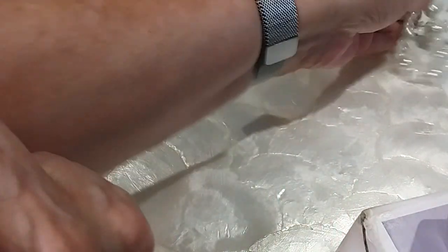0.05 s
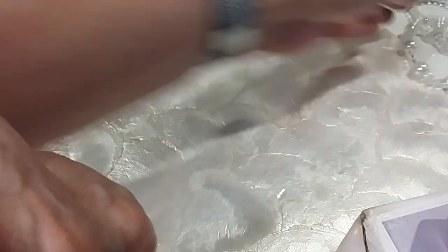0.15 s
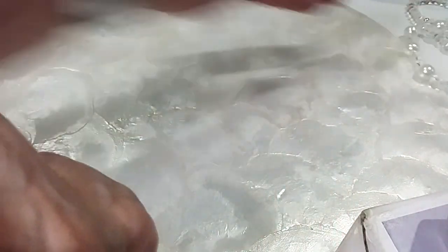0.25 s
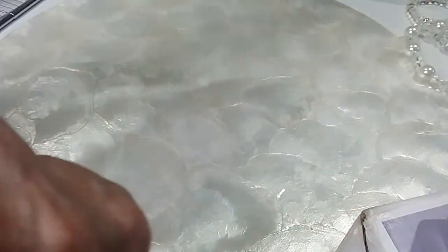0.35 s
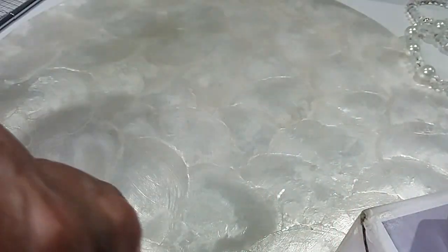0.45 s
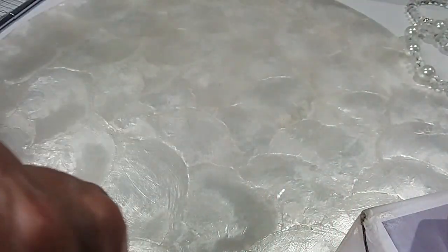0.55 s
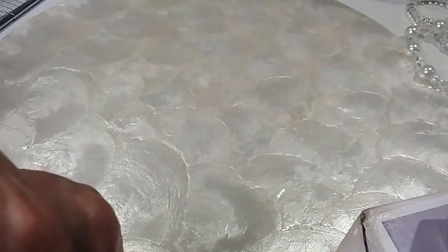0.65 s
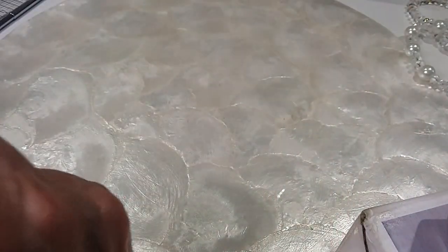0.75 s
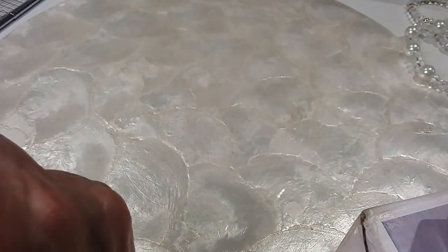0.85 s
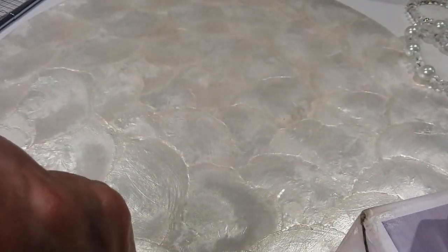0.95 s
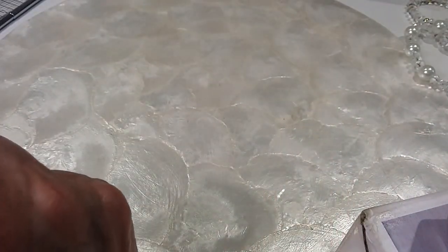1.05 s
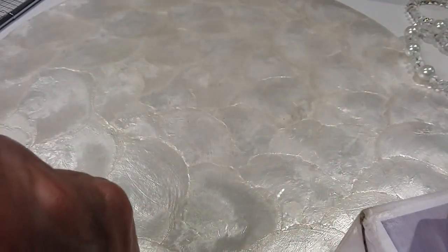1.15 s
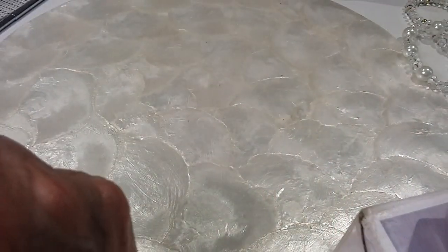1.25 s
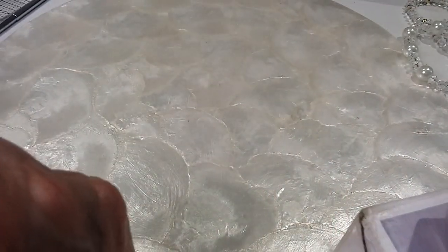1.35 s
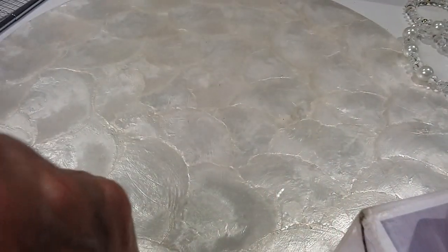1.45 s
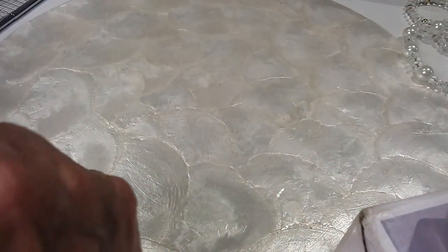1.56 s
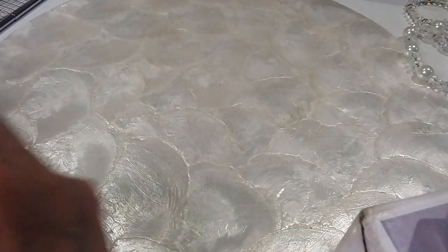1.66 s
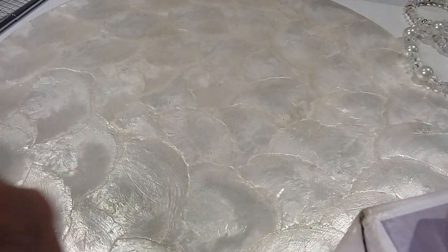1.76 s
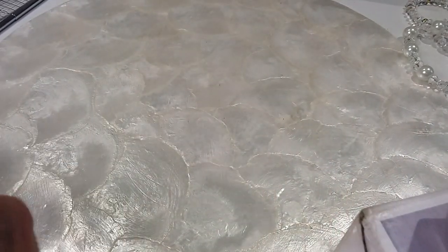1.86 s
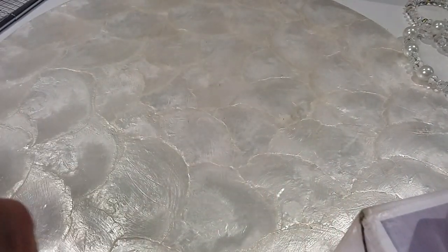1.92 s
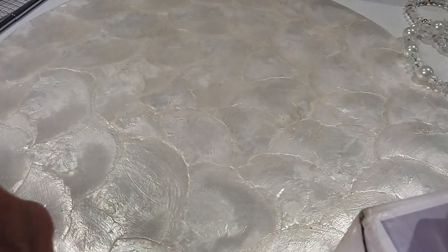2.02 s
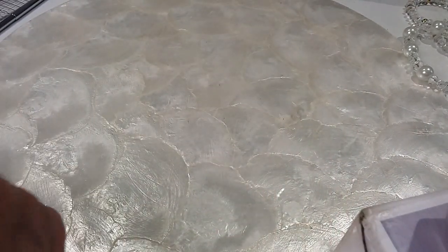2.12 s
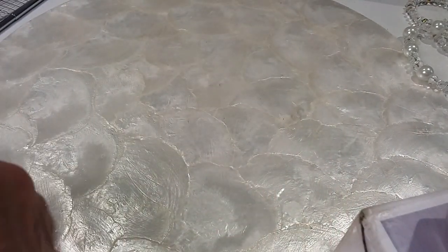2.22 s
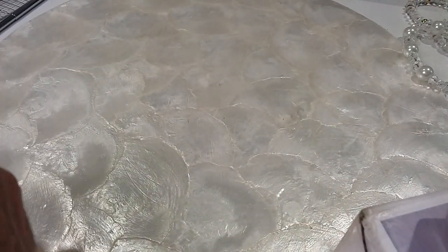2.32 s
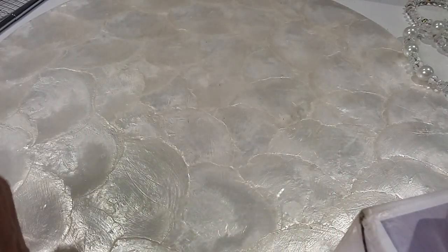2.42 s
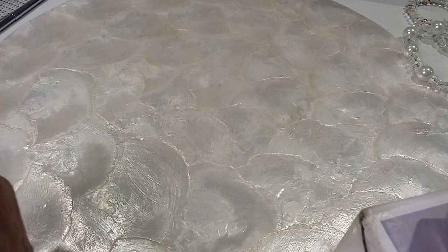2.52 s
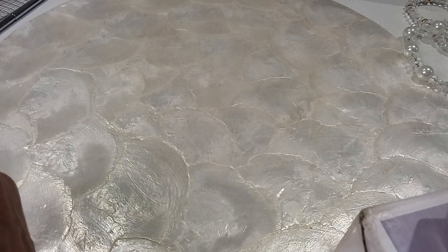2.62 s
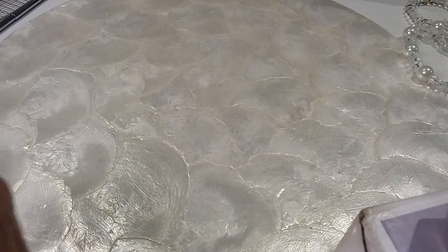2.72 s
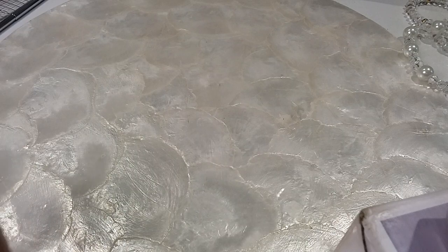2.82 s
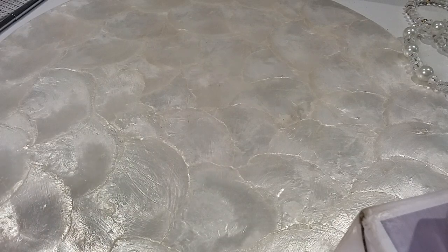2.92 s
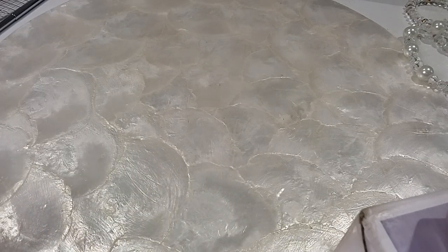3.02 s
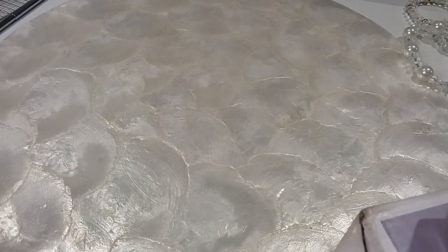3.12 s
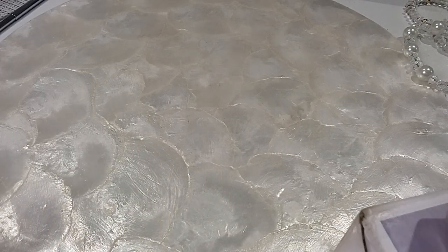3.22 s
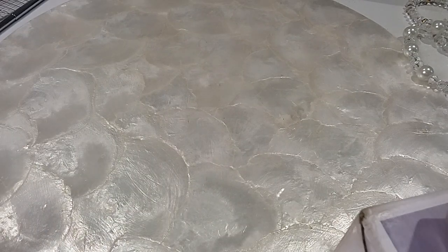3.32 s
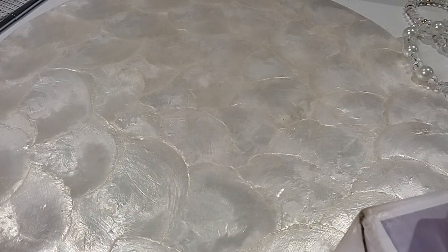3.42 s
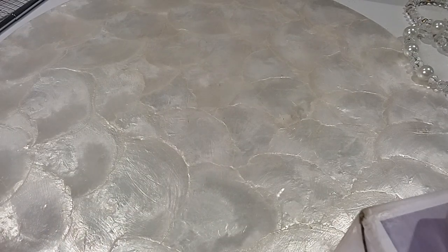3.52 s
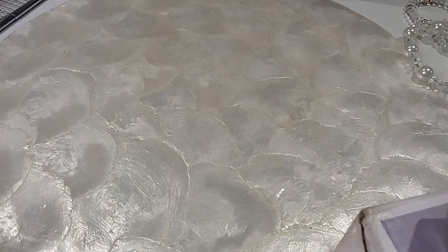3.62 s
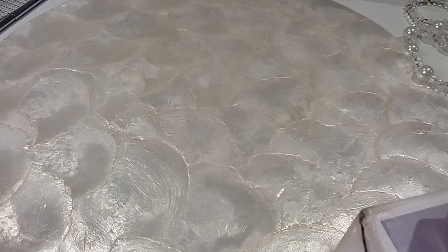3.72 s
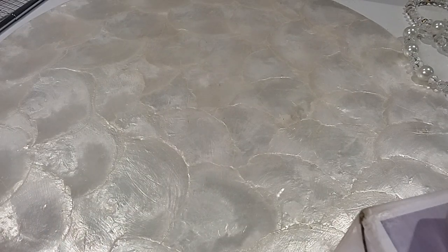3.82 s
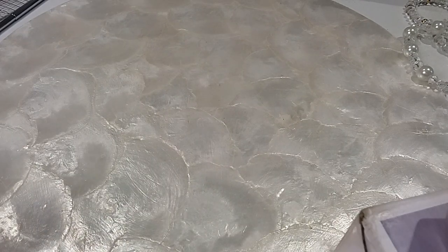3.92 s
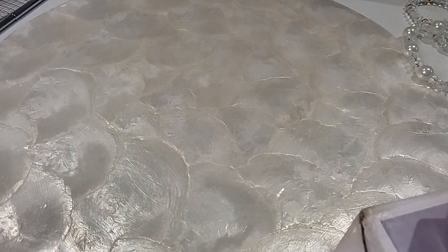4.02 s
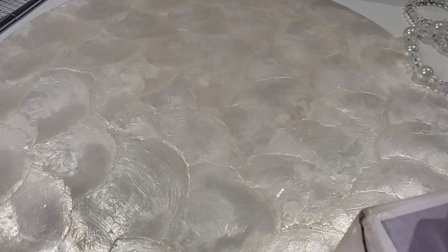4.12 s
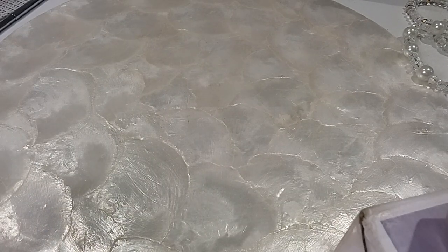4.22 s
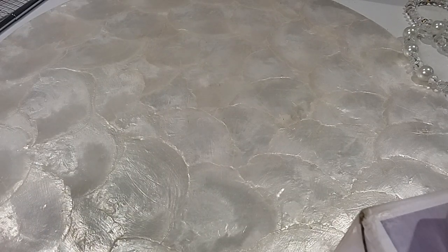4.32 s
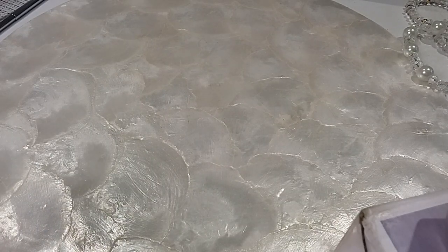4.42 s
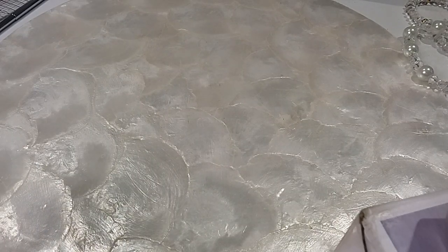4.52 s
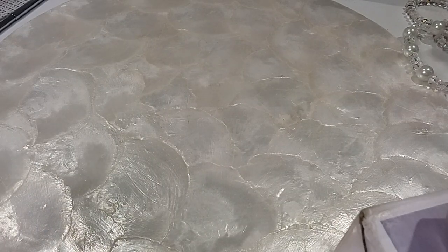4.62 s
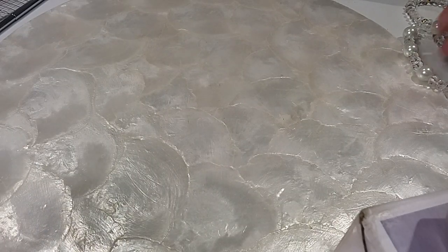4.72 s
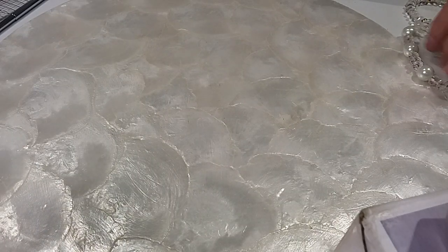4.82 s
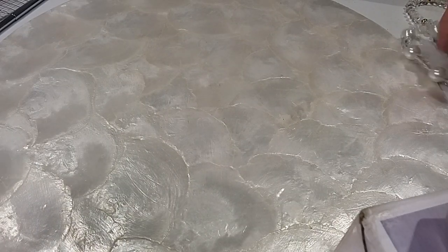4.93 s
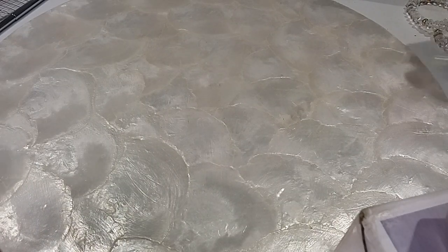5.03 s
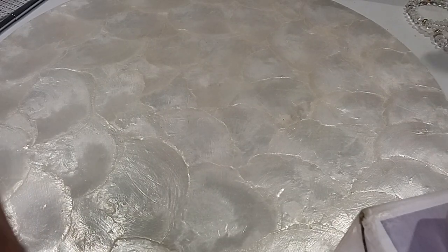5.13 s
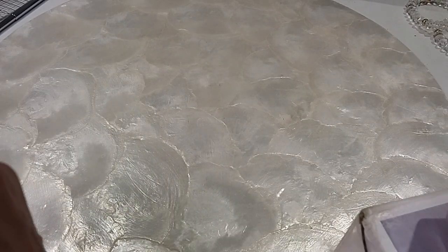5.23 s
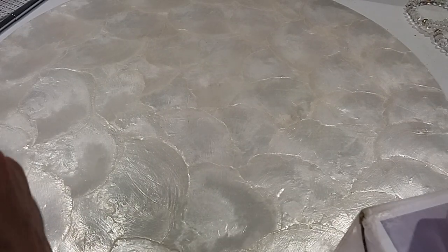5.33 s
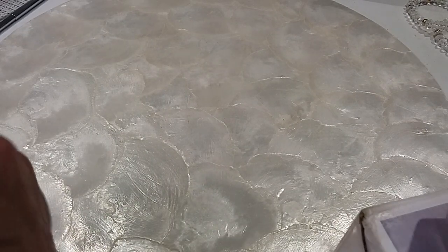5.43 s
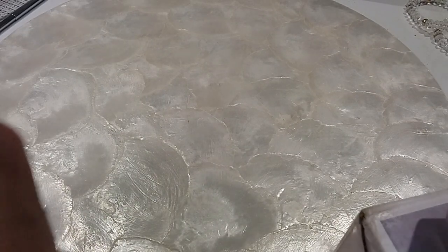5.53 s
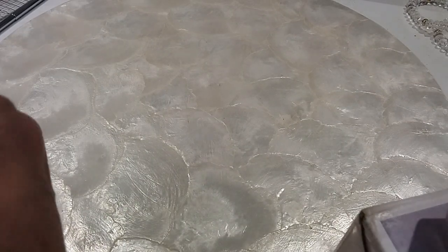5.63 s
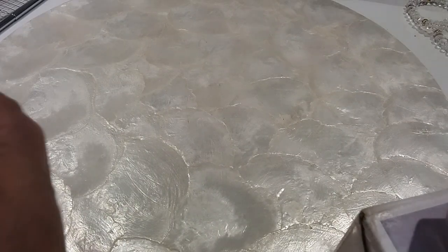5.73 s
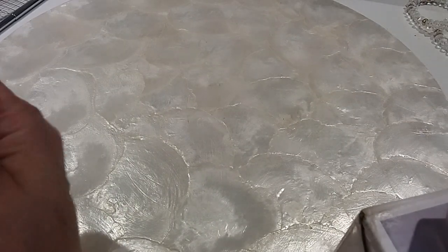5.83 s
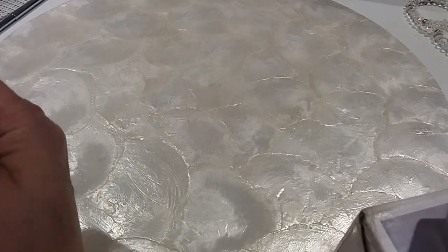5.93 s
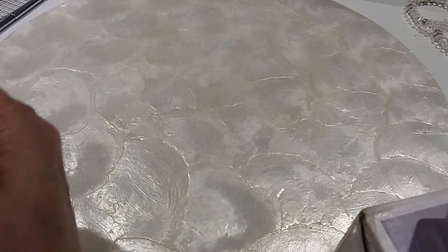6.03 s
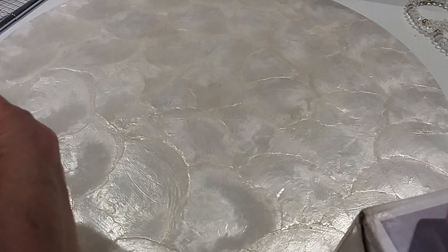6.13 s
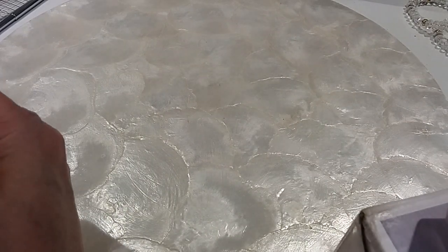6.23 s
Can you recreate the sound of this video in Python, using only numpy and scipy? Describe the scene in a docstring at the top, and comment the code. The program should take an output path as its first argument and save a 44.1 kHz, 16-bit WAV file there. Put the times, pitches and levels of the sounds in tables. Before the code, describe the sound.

Very close, beads drop and roll on a hard shell-covered table from 0 to 0.3 s, a loud dense run of ringing clacks ending with the strongest hits and a soft bump. Only a low motor hum and room air remain until a faint bump at 0.7 and light bead clicks near 1.0. From 1.2 to 1.75 s come fine rustles, crisp ticks and barely audible tiny squeaks. A duller clack falls at 2.0, then a hard object lands at 2.3 s with a loud woody knock and quick settling. Snaps follow to 2.5, with a small double bead click at 2.9. Ticks at 3.2 lead to busy picking, swishes and thin singing scrapes from 3.55 to 4.2. After a pause, beads rattle lightly at 4.9-5.2. Soft rubbing and sparse clicks finish around 5.9-6.2. The small room answers with a brief tail.

```python
"""Bead bracelets on a shell-topped table

Close to the microphone, beads roll and clack on the table: grains, ringing clicks and one hop per bead.
Beside them things are picked through with rustles, ticks, squeaks and scrapes, all made of filtered
grains, damped rings and short tones; something hard lands with a knock built of a thud and table modes.
A motor hums over the air of the small room, whose decaying noise tail answers most of the contacts."""
import sys
import numpy as np
from scipy import signal
from scipy.fft import rfft, irfft, next_fast_len
from scipy.io import wavfile
from scipy.ndimage import map_coordinates

SR = 44100
rng = np.random.default_rng(int(sys.argv[2]) if len(sys.argv) > 2 else 0)


def generate_wav(sig):
    """Save sig (samples, or channels by samples) to the path in sys.argv[1] as 16-bit PCM at SR."""
    pcm = np.round(np.clip(np.atleast_2d(sig).T, -1, 1) * 32767).astype(np.int16)
    wavfile.write(sys.argv[1], SR, pcm)


N = 276176  # length in samples
TOP_HZ = 16050  # upper band limit at the microphone


def amp(db):
    """Decibels to gain."""
    return 10 ** (np.asarray(db) / 20)


def unit(x):
    """Scaled to rms 1."""
    return x / np.sqrt(np.mean(x ** 2) + 1e-20)


def at_peak(x, db):
    """x scaled to a peak level."""
    return amp(db) * x / np.abs(x).max()


def add(track, s, x):
    """Mix x into the track from time s."""
    start = max(round(s * SR), 0)
    track[start:start + len(x)] += x[:max(N - start, 0)]


def along(points, hz):
    """(Hz, value) points read on a log axis."""
    f, v = np.transpose(points)
    return np.interp(np.log(np.maximum(hz, f[0])), np.log(f), v)


def wobble(rate):
    """A smooth random curve, rate knots a second."""
    knots = rng.standard_normal(int(N * rate / SR) + 4)
    return map_coordinates(knots, [np.arange(N) * rate / SR])


def coloured(x, gain_db):
    """x shaped by a function of frequency that gives dB."""
    m = next_fast_len(N + SR // 4)
    gain = amp(gain_db(np.fft.rfftfreq(m, 1 / SR)))
    return irfft(rfft(x, m) * gain, m)[:N]


def pulse(gain_db, size=2048):
    """The causal (minimum-phase) click whose spectrum is the given function of frequency."""
    cepstrum = irfft(np.log(amp(gain_db(np.fft.rfftfreq(size, 1 / SR)))))
    cepstrum[1:size // 2] *= 2
    cepstrum[size // 2 + 1:] = 0
    return irfft(np.exp(rfft(cepstrum)))


def resonance(hz, centre, q):
    """A bell of height 1 around the centre frequency."""
    return 1 / np.sqrt(1 + (2 * q * (hz - centre) / centre) ** 2)


def scatter(t60, db):
    """An impulse followed by dense, dying micro-contacts of the given total level."""
    t = np.arange(SR // 10) / SR
    tail = rng.standard_normal(len(t)) * amp(-60 * t / t60)
    return (t == 0) + amp(db) * tail / np.linalg.norm(tail)


def grains(rate, spread_db):
    """Random tiny contacts of uneven size, rms 1."""
    sizes = amp(spread_db * np.minimum(rng.exponential(size=N), 3))
    signed = sizes * rng.choice([-1, 1], N)
    return unit(signed * (rng.random(N) < rate / SR))


def pings(rate, centre_hz, octaves, cycles, spread_db):
    """A cloud of tiny damped rings, each at its own pitch and size; rms 1."""
    draws = rng.random((int(rate * N / SR), 4))
    when, low, high, size = draws.T[:, :, None]
    hz = np.minimum(centre_hz * 2 ** (octaves * (high - low)), TOP_HZ)
    n = np.arange(SR // 150)
    turns = hz * n / SR
    rings = amp(spread_db * size ** 2) * np.sin(2 * np.pi * turns) * np.exp(-turns / cycles)
    places = (when * N).astype(int) + n
    return unit(np.bincount(places.ravel(), rings.ravel(), N)[:N])


# decay of the small room: pitch_hz, t60_s
ROOM_DECAY = [(150, 0.26), (1500, 0.2), (5000, 0.2), (15000, 0.092)]


def room_tail():
    """A fresh answer of the room, of energy 1, which builds up over a few milliseconds."""
    hz, t, z = signal.stft(rng.standard_normal(SR // 2), SR, nperseg=256)
    decay = amp(-60 * t / along(ROOM_DECAY, hz)[:, None])
    tail = signal.istft(z * decay, SR, nperseg=256)[1]
    tail *= 1 - np.exp(-np.arange(len(tail)) / SR / 0.0014)
    return tail / np.linalg.norm(tail)


def in_room(x, wet_db):
    """x followed by the room's answer."""
    answer = amp(wet_db) * room_tail()
    answer[0] = 1
    return signal.fftconvolve(x, answer)


def contact(colour, ring, chatter, db, wet_db):
    """A ringing, chattering click; the room gathers it from all sides and so keeps only its broad colour."""
    click = pulse(lambda hz: colour(hz) + ring(hz))
    direct = at_peak(signal.fftconvolve(click, chatter), db)
    sound = signal.fftconvolve(pulse(colour), room_tail())
    sound *= amp(wet_db) * np.linalg.norm(direct) / np.linalg.norm(sound)
    sound[:len(direct)] += direct
    return sound


ATTACK_S = 0.013  # every stroke gets under way in this time
RUB_FADE_DB_PER_S = 197  # a rub or scrape holds its level, then the fingers let go


def stroke(s, length, sag_db_per_s, fade_db_per_s):
    """The gain of one movement of the hand: a quick rise, a sagging hold, a fade."""
    t = np.maximum(np.arange(N) / SR - s, 0)
    sag_db = sag_db_per_s * np.minimum(t, length)
    fade_db = fade_db_per_s * np.maximum(t - length, 0)
    return np.minimum(t / ATTACK_S, 1) * amp(-sag_db - fade_db)


MOTOR_HZ, MAINS_HZ = 58.58, 60  # turning rate, supply frequency
# orders of the motor in the room: multiple of the turning rate, level_db (rms, before a slight wobble)
MOTOR_ORDERS = [(1, -74), (2, -60), (3, -50.5), (4, -67), (5, -67), (6, -69), (7, -74)]
# colour of the room air at the microphone: pitch_hz, relative level_db
AIR_COLOUR = [(25, -35), (55, -11), (85, -9), (120, 0), (190, -1), (280, -5.5), (450, -13), (750, -18),
              (1600, -19), (3000, -24.5), (5500, -29.5), (8500, -39.5), (12000, -33), (16000, -33)]


def hum():
    """A motor's orders and faint whine over room air; its magnetic buzz beats slowly against the second order."""
    t = np.arange(N) / SR
    turns = MOTOR_HZ * t + 0.0049 * wobble(5.2)
    tone = np.zeros(N)
    for k, db in MOTOR_ORDERS:
        level = amp(db + 0.78 * wobble(5.4)) * np.sqrt(2)
        tone += level * np.sin(2 * np.pi * (k * turns + rng.random()))
    buzz = amp(-61) * np.sin(2 * np.pi * (2 * MAINS_HZ * t + rng.random()))
    whine = amp(-73 + 1.5 * wobble(6)) * np.sin(2 * np.pi * 892 * t + wobble(12))
    air = amp(-58.5) * unit(coloured(rng.standard_normal(N), lambda hz: along(AIR_COLOUR, hz)))
    return tone + buzz + whine + air


# rings of beads on the table top: pitch_hz, nominal lift_db
TABLE_RINGS = [(850, 7.5), (1600, 3), (2380, 11), (3150, 5.5), (10000, -5.5)]


def table_lift(hz, strengths):
    """The resonances of beads on the table top in dB, each driven at its own strength."""
    return sum(share * db * resonance(hz, centre_hz, q=4.9)
               for share, (centre_hz, db) in zip(strengths, TABLE_RINGS))


# beads dragged over the table: start_s, length_s, level_db (rms of the rattle before it sags)
BEAD_DRAGS = [(-0.02, 0.12, -35), (0.11, 0.12, -46), (0.961, 0.14, -58), (1.253, 0.1, -55),
              (2.974, 0.21, -63.5), (3.292, 0.071, -67), (4.87, 0.059, -53), (4.99, 0.024, -52)]
DRAG_SAG_DB_PER_S, DRAG_FADE_DB_PER_S = 39, 273  # the beads lose speed, then come to rest
# colour of bead on shell, for drags and clacks: pitch_hz, relative level_db
BEAD_COLOUR = [(40, -75), (120, -22), (200, -9), (500, -9), (850, -4), (1150, -0.5), (1700, -3), (2700, -9),
               (4200, -13.5), (8000, -20.5), (10500, -12.5), (16000, -25.5)]


def slide():
    """Rolling beads trip over the seams of the shell in a run of tiny clacks."""
    level = np.max([amp(db) * stroke(s, length, DRAG_SAG_DB_PER_S, DRAG_FADE_DB_PER_S)
                    for s, length, db in BEAD_DRAGS], axis=0)

    def colour(hz):
        lift = table_lift(hz, np.ones(len(TABLE_RINGS)))
        return along(BEAD_COLOUR, hz) + lift + 3 * resonance(hz, 2800, q=5.1)

    rattle = unit(coloured(grains(rate=550, spread_db=1.0), colour))
    beads = pings(rate=150, centre_hz=2000, octaves=1.0, cycles=2.9, spread_db=20)
    return in_room(level * (rattle + amp(-10.5) * beads), wet_db=-5.5)[:N]


# strokes of rubbing as things are picked through:
# start_s, length_s, level_db (rms of the swish), crisp_db (crisp top relative to the swish)
RUB_STROKES = [(-0.015, 0.07, -58.5, 5), (1.213, 0.049, -65.5, -14), (1.298, 0.02, -59, 3),
               (1.32, 0.088, -60, -3), (1.463, 0.24, -70, 0), (1.691, 0.028, -59.5, -16),
               (2.02, 0.16, -59.5, -13), (2.336, 0.19, -60.5, -0.5), (2.544, 0.11, -69, -5),
               (2.789, 0.36, -67, -21), (3.193, 0.14, -66, -4), (3.35, 0.13, -62, -17),
               (3.635, 0.044, -53, -9), (3.674, 0.045, -56.5, -12), (3.77, 0.02, -62, -13),
               (3.924, 0.034, -56, -12), (3.983, 0.014, -53.5, -15), (4.098, 0.1, -58, -13),
               (4.163, 0.025, -52.5, -11), (4.88, 0.032, -70, 3), (5.02, 0.06, -66.5, -2),
               (5.33, 0.21, -68, -18), (5.95, 0.24, -69, -11), (6.192, 0.043, -54.5, -16)]


def rubbing_levels():
    """The levels of the swish and of its crisp top in dB; the strongest stroke leads at each moment."""
    levels = np.full((2, N), 1e-6)
    for s, length, db, crisp_db in RUB_STROKES:
        peaks = amp([[db], [db + crisp_db]])
        levels = np.maximum(levels, peaks * stroke(s, length, 0, RUB_FADE_DB_PER_S))
    return 20 * np.log10(levels)


GENTLE_DB, FIRM_RANGE_DB = -72.5, 19.5  # rubbing starts to tinkle here, and does so fully this much higher
# colours of the low swish and of its crisp top: pitch_hz, relative level_db
SWISH_COLOUR = [(150, -27), (500, 9), (1500, 9.5), (3000, 7.5), (6500, -0.5), (8500, -5.5), (16000, -39)]
CRISP_COLOUR = [(4000, -48), (8500, -8), (10000, -20), (13000, 0), (16000, 6)]


def rustle(swish_db, crisp_db):
    """A fine swish of rubbing with crisp grains on top; firmer handling shakes tiny pitched ticks out of it."""
    firmness = np.clip((swish_db - GENTLE_DB) / FIRM_RANGE_DB, 0, 1)
    swish = unit(coloured(grains(rate=5000, spread_db=12), lambda hz: along(SWISH_COLOUR, hz)))
    tinkle = pings(rate=180, centre_hz=4620, octaves=0.98, cycles=4.0, spread_db=6)
    crisp = unit(coloured(grains(rate=1500, spread_db=9), lambda hz: along(CRISP_COLOUR, hz)))
    sparkle = pings(rate=290, centre_hz=11900, octaves=0.26, cycles=4.4, spread_db=-4)
    rubbing = amp(swish_db) * (swish + amp(-1) * firmness * tinkle)
    rubbing += amp(crisp_db) * (crisp + amp(-2.5) * sparkle)
    grip = amp(2.2 * wobble(45))  # the level wavers with the grip
    return in_room(rubbing * grip, wet_db=-7.5)[:N]


STRAY_PER_S = 22  # chances a second, taken only while things rub
STRAY_DB, STRAY_SPREAD_DB = 21, 5  # peak over the rubbing, scatter either way
STRAY_HZ = 4200  # middle ring, scattered an octave either way
STRAY_BODY_DB, STRAY_TREBLE_DB = -4, -11.5


def stray_ticks(rub_db):
    """Rows of chance ticks, as strong as the rubbing that shakes them loose."""
    rows = []
    for when, size, pitch in rng.random((int(STRAY_PER_S * N / SR), 3)):
        db = rub_db[int(when * N)]
        if db > GENTLE_DB - 2:
            peak_db = db + STRAY_DB + STRAY_SPREAD_DB * (2 * size - 1)
            ring_hz = STRAY_HZ * 2 ** (2 * pitch - 1)
            rows.append((when * N / SR, peak_db, ring_hz, STRAY_BODY_DB, STRAY_TREBLE_DB))
    return rows


def rebound(x, db):
    """x and its weaker repeat: the bead makes a tiny second bounce a moment later."""
    lag = round(rng.uniform(.001, .0028) * SR)
    return np.pad(x, (0, lag)) + amp(db) * np.pad(x, (lag, 0))


# beads meeting the table close by: start_s, peak_db, ring_hz, body_db, treble_db (tilts of the colour)
BEAD_CLACKS = [(0.009, -28, 1640, 3, 4), (0.034, -18.5, 1710, -5, -7), (0.048, -15.5, 1660, 4, -12),
               (0.07, -29.5, 2400, -1, 17), (0.102, -24.5, 2240, 1, -8), (0.117, -12.5, 1660, 2, 6.5),
               (0.16, -22, 2520, -9, -9), (0.179, -27.5, 2390, -2, -20), (0.219, -11.5, 1750, -9, 1),
               (0.232, -12, 2550, 15.5, 6.5), (0.978, -32.5, 2230, 5, 7), (1.004, -30, 2660, -22, 4.5),
               (1.36, -28, 2350, 8, 14.5), (1.707, -34.5, 690, 10, -5), (2.013, -38, 2420, 1, -5),
               (2.024, -19, 2130, -1, -19), (2.169, -34.5, 1800, 4, 2), (2.918, -27.5, 1450, 2, -4),
               (2.926, -29, 1540, -11, -11), (4.862, -23, 2900, 1, 4), (5.015, -29, 1730, 9.5, 3),
               (5.058, -21.5, 1670, -14, -4), (5.072, -32, 1600, -2, 0), (5.082, -26.5, 1550, 0, 0),
               (5.206, -42, 600, 9, 1), (5.362, -41.5, 2160, 5, 3), (5.886, -33.5, 1840, 7.5, -3)]
BOUNCE_S, BOUNCE_DB = 0.009, -14  # typical flight time, level of the second landing against the first


def clacks():
    """Each bead chatters on the table for an instant, rings the spot where it lands and hops once."""
    out = np.zeros(N)
    for s, db, ring_hz, body_db, treble_db in BEAD_CLACKS:
        strengths = rng.uniform(.5, 1.5, len(TABLE_RINGS))

        def colour(hz):
            body = body_db * along([(600, 0.95), (1100, 0.047)], hz)
            treble = treble_db * along([(2800, 0.089), (6000, 1.0)], hz)
            return along(BEAD_COLOUR, hz) + table_lift(hz, strengths) + body + treble

        ring = lambda hz: 9 * resonance(hz, ring_hz, q=9.6)
        flight = BOUNCE_S * rng.uniform(.7, 1.3)
        for when, peak_db in [(s, db), (s + flight, db + BOUNCE_DB)]:
            chatter = rebound(scatter(t60=0.0063, db=9.5), db=-4.5)
            add(out, when, contact(colour, ring, chatter, peak_db, wet_db=-8.0))
    return out


# soft bumps that move the table top: start_s, peak_db (before the room answers), pitch_hz
TABLE_BUMPS = [(0.235, -27.5, 278), (0.742, -41, 225), (2.072, -34, 190.8), (2.169, -38, 239.5),
               (2.925, -37.5, 434), (4.865, -44, 113.9)]
# colour of a bump: multiple of its pitch, relative level_db
BUMP_COLOUR = [(.2, -33), (.6, -0.5), (1, 5), (1.8, -6.5), (6, -43), (20, -91)]


def bumps():
    """Soft pushes that the table damps within a cycle or two."""
    out = np.zeros(N)
    for s, db, centre_hz in TABLE_BUMPS:
        push = pulse(lambda hz: along(BUMP_COLOUR, hz / centre_hz))
        add(out, s, in_room(at_peak(push, db), wet_db=-2.0))
    return out


# the clear snaps of handling: start_s, peak_db, ring_hz, body_db, treble_db (tilts of the colour)
HANDLING_TICKS = [(1.0725, -42.5, 2290, -12, -6), (1.260, -30, 6490, -5, -2),
                  (1.313, -25.5, 3630, -6, -4.5), (1.398, -34, 6970, 3, -5), (1.516, -36, 5860, -18, 0),
                  (1.588, -31.5, 5940, -19, -2), (1.7125, -30, 2450, -3, -8),
                  (1.8414, -43, 5900, -14, -7.5), (2.0194, -26.5, 2200, -1.5, -17),
                  (2.069, -30.5, 2220, 3.5, -14), (2.240, -35.5, 2000, -8, -9.5),
                  (2.328, -31, 1820, -16, -5), (2.373, -23, 2090, -8, 0.5), (2.433, -29.5, 1910, -0.5, -7),
                  (2.478, -26, 4870, -7.5, -2.5), (2.5004, -24.5, 6660, -11.5, 8),
                  (2.679, -39, 2090, -3, -16), (2.837, -45, 5960, -9, -32), (3.1958, -24.5, 3980, -6, -5),
                  (3.2085, -32, 2900, 3, 3), (3.426, -36.5, 5570, -5, -13), (3.5755, -27, 6450, -7.5, -8.5),
                  (3.622, -29.5, 6060, -22, -18), (3.6343, -27, 1910, 2, -12), (3.646, -22.5, 2000, 3, -20),
                  (3.654, -23.5, 6830, -16, -10), (3.680, -25.5, 3200, -8, -11),
                  (3.7287, -28.5, 1795, -1.5, -14), (3.773, -22.5, 3620, -1, -8.5),
                  (3.910, -31, 2060, 3.5, -17), (3.925, -27.5, 5380, -2, -18),
                  (3.931, -23, 6950, -3.5, -12.5), (3.9996, -24.5, 4150, -3, -19),
                  (4.0645, -33.5, 6980, -22, 5), (4.1585, -30, 2740, -3, -16),
                  (4.1845, -25.5, 6960, -5, -10), (4.193, -24, 5630, -3.5, -8),
                  (5.947, -32.5, 4557, -1, -21), (5.974, -34.5, 2750, -2, -34),
                  (6.142, -35.5, 1980, -7, -26), (6.214, -27.5, 3150, 2, -19)]
# colour of a tick: pitch_hz, relative level_db
TICK_COLOUR = [(40, -42), (350, 1), (1500, -1), (3500, -6), (6700, -5.5), (8500, -13), (10500, -5.5),
               (16000, -8)]


def ticks(rows):
    """Small snaps, each with its own ring, body and brightness."""
    out = np.zeros(N)
    for s, db, ring_hz, body_db, treble_db in rows:
        def colour(hz):
            body = body_db * along([(2000, 1.0), (3500, 0.099)], hz)
            treble = treble_db * along([(7000, 0.023), (9500, 1.0)], hz)
            return along(TICK_COLOUR, hz) + body + treble + 2 * resonance(hz, ring_hz, q=8.3)

        ring = lambda hz: 7 * resonance(hz, ring_hz, q=12)
        add(out, s, contact(colour, ring, scatter(t60=0.01, db=4.0), db, wet_db=-4.0))
    return out


# brief squeaks of something sticking as it slips: start_s, peak_db (before the room answers), pitch_hz
SLIP_SQUEAKS = [(1.147, -41, 576), (1.622, -41, 2000)]


def squeaks():
    """A narrow, scratchy tone that swells and is gone in about ten milliseconds."""
    out, t = np.zeros(N), np.arange(SR // 10) / SR
    for s, db, hz in SLIP_SQUEAKS:
        # sticking is uneven, so the phase wanders
        drift = np.cumsum(rng.standard_normal(len(t))) * np.sqrt(hz / SR)
        swell = t * np.exp(-t / .0025)
        tone = np.sin(2 * np.pi * hz * t + .5 * drift) * swell
        add(out, s, in_room(at_peak(tone, db), wet_db=-10))
    return out


# the hard thing lands and settles: start_s, peak_db (of the thud before the room answers)
KNOCK_BLOWS = [(2.2919, -9), (2.2983, -22), (2.303, -20)]
# colour of the thud: pitch_hz, relative level_db
KNOCK_COLOUR = [(40, -56), (100, -11), (180, 1.5), (350, 1.5), (550, 0.5), (900, -0.5), (1500, 6.5),
                (2100, 1.5), (3300, -11), (5500, -28), (9000, -32), (16000, -32)]
# ring of the struck top: pitch_hz, relative level_db (nominal), t60_s
KNOCK_RINGS = [(187, -6, 0.15), (815, -6, 0.13), (1490, -3, 0.085), (1890, 2, 0.077), (3630, -22, 0.21)]


def knock():
    """A dull hard blow, a quick settling, and the short ring of the struck top."""
    out, t = np.zeros(N), np.arange(SR // 2) / SR
    blow = pulse(lambda hz: along(KNOCK_COLOUR, hz))
    for s, db in KNOCK_BLOWS:
        ring = np.zeros(len(t))
        for hz, level, t60 in KNOCK_RINGS:
            decay = amp(level + rng.normal(0, 2) - 60 * t / t60)
            ring += decay * np.sin(2 * np.pi * hz * t + rng.uniform(0, 2 * np.pi))
        thud = signal.fftconvolve(blow, scatter(t60=0.039, db=-11.0))
        add(out, s, in_room(at_peak(thud, db), wet_db=-1.0))
        add(out, s, at_peak(ring, db - 15.5))
    return out


# light scrapes that make a small hard piece sing: start_s, length_s, level_db (rms), ring_hz
SINGING_SCRAPES = [(3.561, 0.02, -59, 6050), (3.695, 0.015, -53, 3600), (5.26, 0.07, -72, 4370)]
SCRAPE_Q = 8  # sharpness of each of the two equal bells that shape the ring


def scrapes():
    """Grains of friction drive one narrow resonance."""
    out = np.zeros(N)
    for s, length, db, ring_hz in SINGING_SCRAPES:
        colour = lambda hz: 20 * np.log10(resonance(hz, ring_hz, SCRAPE_Q) ** 2)
        sing = unit(coloured(grains(rate=2700, spread_db=9), colour))
        out += amp(db) * sing * stroke(s, length, 0, RUB_FADE_DB_PER_S)
    return out


def scene():
    """Everything at one microphone."""
    swish_db, crisp_db = rubbing_levels()
    table = clacks() + knock() + bumps() + slide()
    handling = ticks(HANDLING_TICKS) + squeaks() + scrapes() + rustle(swish_db, crisp_db)
    strays = ticks(stray_ticks(swish_db))
    return (hum() + table + handling + strays)[None]


def record(dry):
    """The recorder cuts everything above its band limit by 80 dB."""
    return np.array([coloured(x, lambda hz: np.where(hz < TOP_HZ, 0, -80)) for x in dry])


dry = scene()
out = record(dry)
generate_wav(out)
```